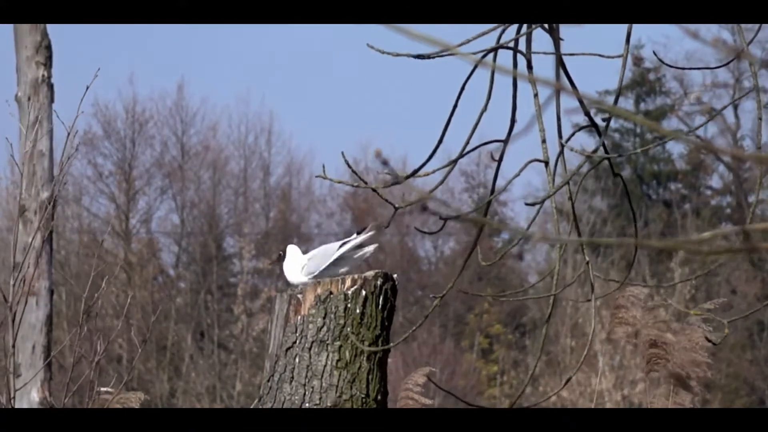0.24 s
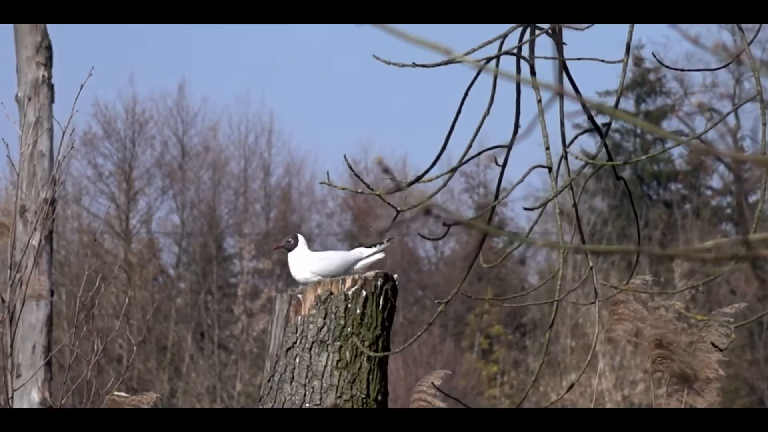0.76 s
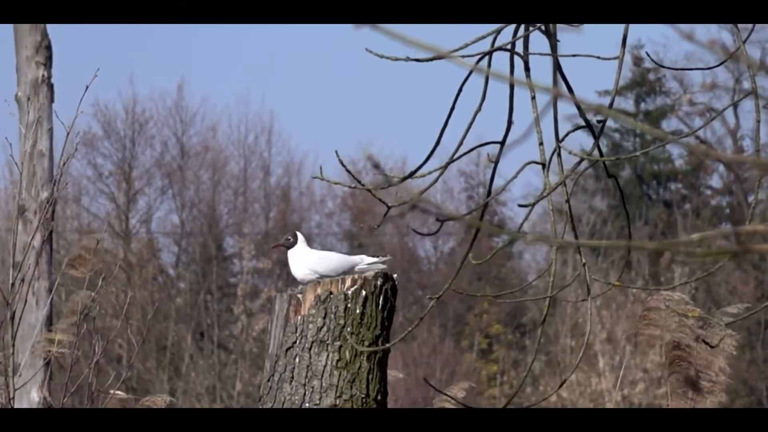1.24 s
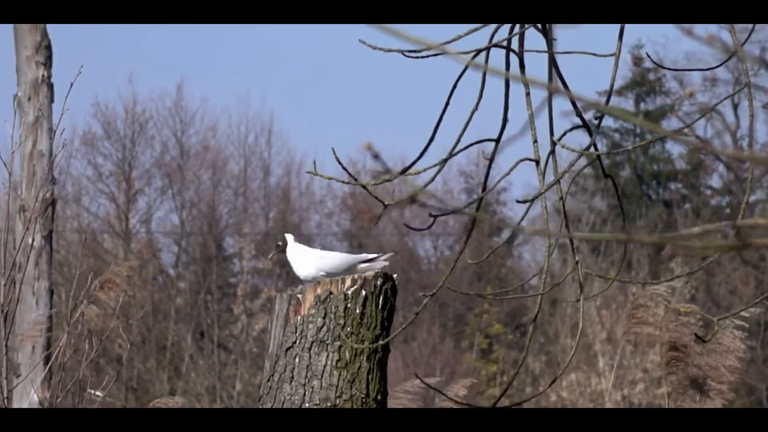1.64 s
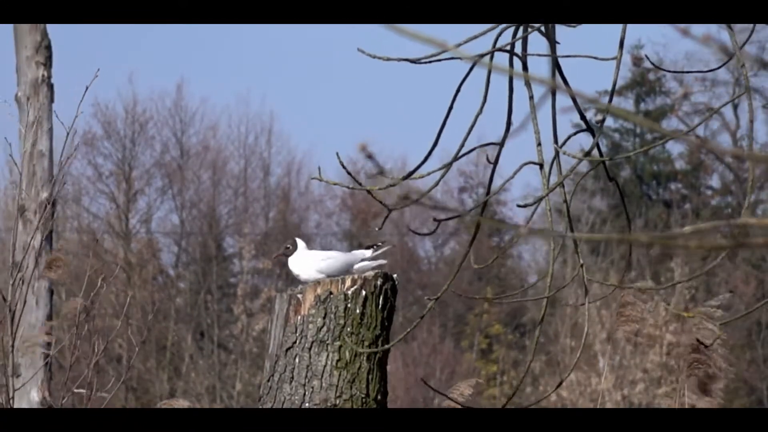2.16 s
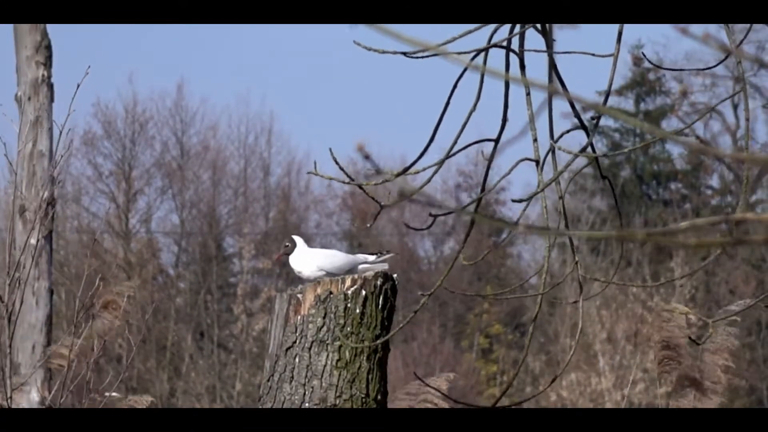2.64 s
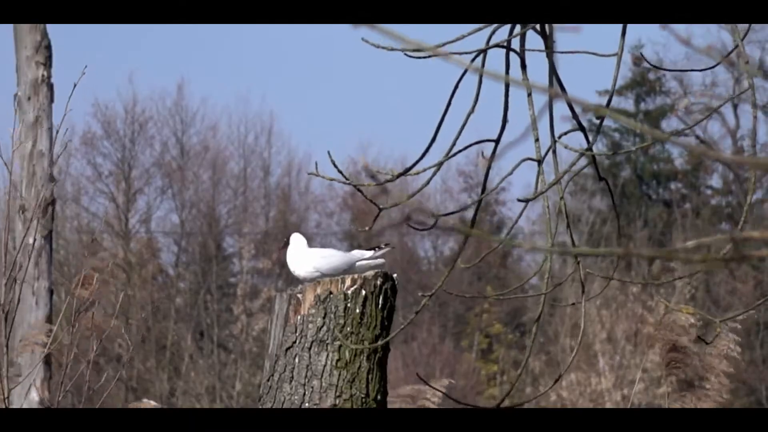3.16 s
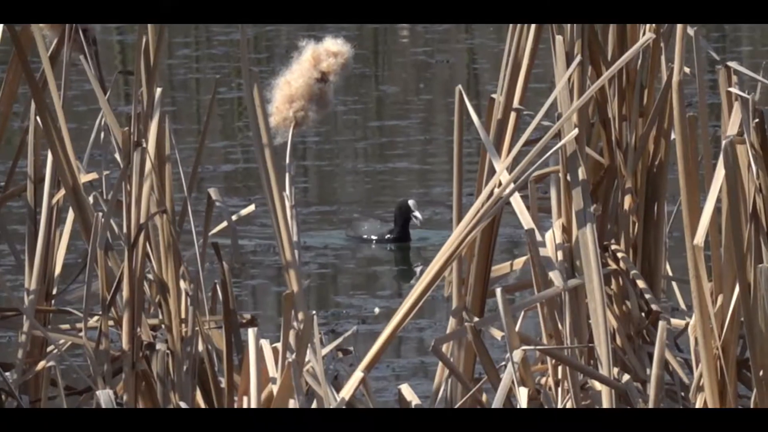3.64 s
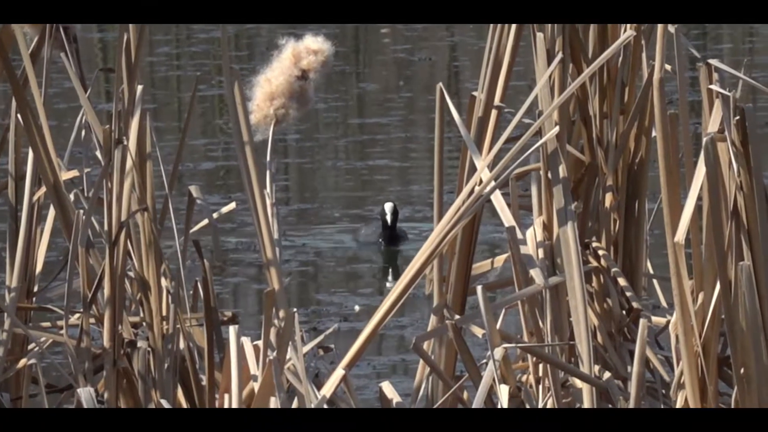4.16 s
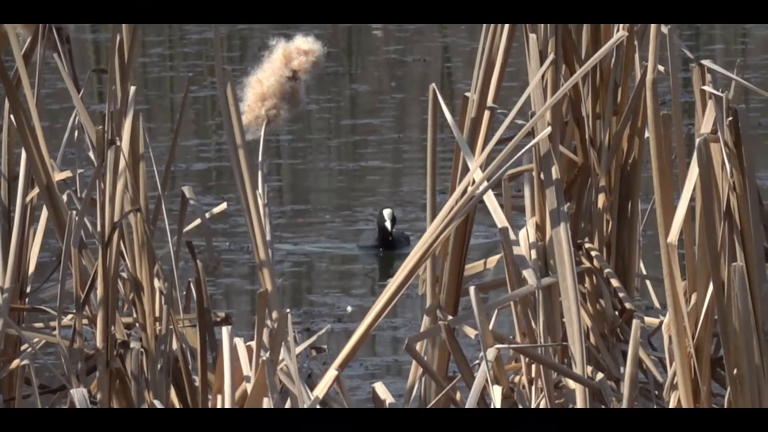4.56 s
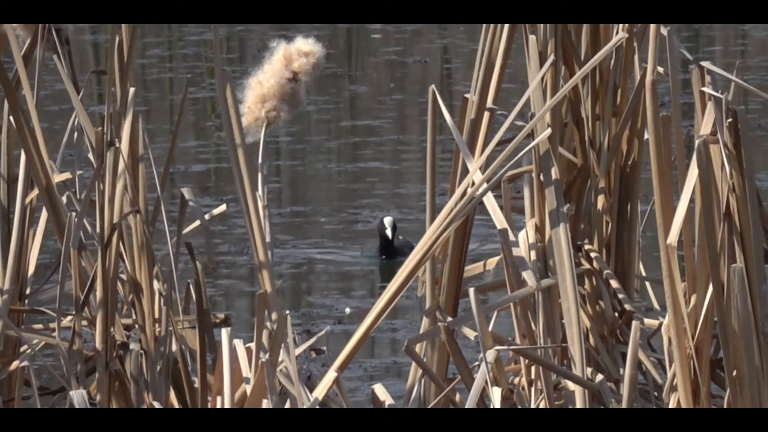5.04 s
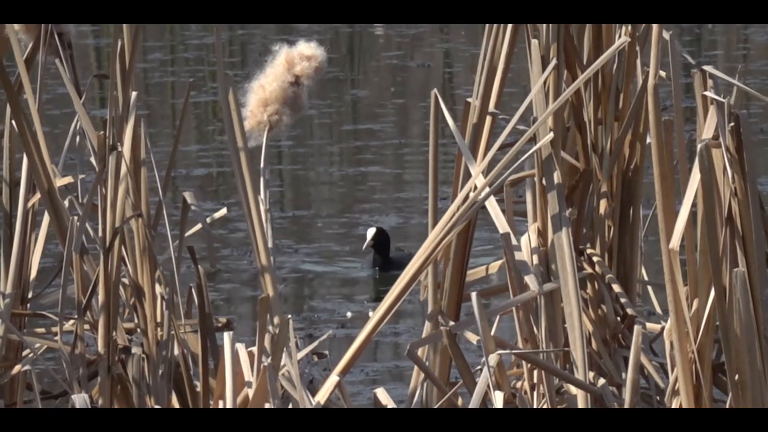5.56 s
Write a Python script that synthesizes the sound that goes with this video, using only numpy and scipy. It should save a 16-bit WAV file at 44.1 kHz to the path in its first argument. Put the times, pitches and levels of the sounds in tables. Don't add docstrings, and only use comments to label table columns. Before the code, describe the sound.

A steady, blurred clamour of many gulls fills an open, reedy lakeside throughout, with soft airy background and short echoes. A close gull is already calling at 0 s, then gives three arching, coarse, rapidly fluttering calls at about 0.2, 0.5 and 0.85 s. Brief high yelps come near 1.0-1.4 s, with a thin call and long rasp around 1.15 s. From 1.6 to 2.5 s, five hoarse brays rise and fall, loudest near 2.2 s. Thin, raspy cries overlap at 2.6 s, then a long falling call at 2.9 s. Clipped yelps cluster at 3.25-3.5 s; a higher rasp comes at 4 s. Low wind puffs buffet the microphone, strongest near 0.25 s and 2.9-3.9 s, dropping sharply after 4.2 s. The crowd dips briefly around 4.3 s. Short cries at 4.4 and 4.6 s lead to a piercing shriek at 4.7 s, then rising, swelling calls until 5.8 s.

```python
import sys
import numpy as np
from scipy import signal
from scipy.fft import rfft, irfft
from scipy.io import wavfile
from scipy.ndimage import uniform_filter1d

SR = 44100
rng = np.random.default_rng(int(sys.argv[2]) if len(sys.argv) > 2 else 0)


def field_ratio(decibels):
    return 10 ** (np.asarray(decibels, dtype=float) / 20)


def master(y):
    cut = np.clip(np.atleast_2d(y).T, -1, 1)
    pcm = np.round(cut * 32767)
    wavfile.write(sys.argv[1], SR, pcm.astype(np.int16))


N = 255339


def evened(x):
    return x / np.sqrt(np.mean(x ** 2) + 1e-20)


def read(points, hz):
    f, value = np.transpose(points)
    return np.interp(np.log(hz + 1), np.log(f + 1), value)


def follow(rows):
    s, *columns = np.transpose(rows)
    return [np.interp(np.arange(N) / SR, s, column) for column in columns]


def add(mix, s, sound):
    part = mix[round(s * SR):][:len(sound)]
    part += sound[:len(part)]


def wobble(n, hz):
    span = max(int(SR / hz), 2)
    noise = rng.standard_normal(n)
    return evened(uniform_filter1d(uniform_filter1d(noise, span), span))


def coloured(points, patchy_db):
    a, b, patches = rng.standard_normal((N // 512 + 5, 1025, 3)).T
    patches = evened(uniform_filter1d(uniform_filter1d(patches, 20, 0), 6, 1))
    level_db = read(points, np.fft.rfftfreq(2048, 1 / SR))[:, None] + patchy_db * patches
    z = (a + 1j * b) * field_ratio(level_db)
    return evened(signal.istft(z, nperseg=2048, noverlap=1536)[1][:N])


def open_air():
    # (frequency [Hz], level per Hz [dB])
    air = [(35, -32), (60, -5), (321, -14), (938, -8.5), (1160, -19), (1840, -50), (2220, -28), (3380, -46),
           (4170, -16), (8780, -31), (10300, -40.5), (15700, -46)]
    return field_ratio(-34) * coloured(air, patchy_db=2.0)


def wind():
    # (frequency [Hz], level per Hz [dB])
    gust = [(1, -20), (4, -2), (10, 0), (20, -6), (30, -15), (60, -20), (110, -32), (300, -45), (600, -90)]
    # (time [s], level [dB])
    breeze = [
        (0.0, -26.5),
        (4.1, -30),
        (4.3, -46),
        (4.5, -35.5),
        (5.63, -36),
        (5.79, -42),
    ]
    # (centre time [s], strength [dB], length [s])
    puffs = [(0.09, -29, .1), (0.239, -15.5, 0.074), (0.476, -21.5, 0.094), (0.777, -23, .18),
             (1.124, -30, .25), (1.397, -27, 0.15), (1.898, -26.5, 0.3), (2.077, -36, .12),
             (2.225, -27.5, .12), (2.373, -27, 0.094), (2.67, -26, 0.28), (2.928, -19, 0.12),
             (3.04, -17, 0.11), (3.46, -18, 0.29), (3.707, -14, 0.069), (3.859, -18.5, 0.17),
             (4.125, -25, 0.2), (4.422, -27, 0.065), (4.87, -46, .15), (5.5, -43, 0.17)]
    spectrum = rfft(rng.standard_normal(N))
    lumps = irfft(spectrum * field_ratio(read(gust, np.fft.rfftfreq(N, 1 / SR))), N)
    t = np.arange(N) / SR
    force = field_ratio(follow(breeze)[0])
    for s, db, length in puffs:
        force += field_ratio(db) * np.exp(-(2 * (t - s) / length) ** 2)
    return force * lumps / np.sqrt(uniform_filter1d(lumps ** 2, 14000) + 1e-12)


def shore(x):
    # (frequency [Hz], time to fall 60 dB [s])
    decay = [
        (500, 1),
        (2000, 0.4),
        (6000, 0.69),
        (14000, 0.032),
    ]
    taps = np.zeros(SR)
    at = np.arange(400, SR - 20, 20) + rng.integers(0, 20, (SR - 401) // 20)
    taps[at] = rng.choice([-1., 1.], len(at))
    hz, t, z = signal.stft(taps, SR, nperseg=256)
    tail = signal.istft(z * field_ratio(-60 * t / read(decay, hz)[:, None]), SR, nperseg=256)[1]
    return signal.fftconvolve(x, tail / np.linalg.norm(tail))[:N]


def cry(rows, voice, hoarse, top_hz):
    # (frequency [Hz], width [Hz], level [dB])
    tract = [
        (850, 400, -19),
        (1800, 650, 0),
        (2750, 450, -14.5),
        (12900, 3700, 0),
    ]
    bursts_hz, beak_hz, beak_db, edge_hz, edge_db, rasp_db = voice
    s, pitch_hz, effort_db = np.transpose(rows)
    t = np.arange(s[0], s[-1], 1 / SR)
    hz = uniform_filter1d(np.interp(t, s, pitch_hz), 600)

    flutter = np.cumsum(bursts_hz * (1 + .2 * hoarse * wobble(len(t), 60))) / SR % 1
    opening = np.sin(np.pi * np.minimum(flutter / 0.731, 1))
    gate = 0.22 + np.clip(2.34 * opening, 0, 1) ** 0.96
    bend = 1 + .062 * (flutter - .4) + .022 * hoarse * wobble(len(t), 120)

    k = np.arange(1, min(int(top_hz / hz.min()), 30) + 1)[:, None]
    *body, rasp = tract
    beak, edge = (beak_hz, 1000, beak_db), (edge_hz, 3200, edge_db)
    resonances = [*body, beak, edge, np.add(rasp, (0, 0, rasp_db))]
    power = sum(field_ratio(db) ** 2 / (1 + (2 * (k * hz[::64] - f) / w) ** 4) for f, w, db in resonances)
    heights = np.repeat(np.sqrt(power / power.sum(0)), 64, axis=1)[:, :len(t)]
    turns = np.cumsum(hz * bend) / SR + rng.random((30, 1))[:len(k)] / k
    heights *= field_ratio(1.8 * rng.standard_normal((30, 1))[:len(k)])
    gate = gate ** np.minimum(k * hz.mean() / 4000, 1.2)
    overtones = gate * heights * np.cos(2 * np.pi * k * turns)

    smeared = np.minimum(hoarse * (.6 + k * hz.mean() / 8000), .85)
    shake = wobble(len(t) + 9000, 750)[np.arange(len(t)) + 300 * k]
    stack = ((1 - smeared + smeared * shake) * overtones).sum(0)
    rise = t - t[0] + (t[0] < .001)
    edges = np.clip(np.minimum(rise, t[-1] - t) / .011, 0, 1)
    return s[0], field_ratio(np.interp(t, s, effort_db)) * evened(stack) * edges


def crowd(count=84):
    # (time [s], clamour [dB], nearness: treble added by closer birds [dB])
    swells = [(0.0, -24, -4), (0.31, -20, -3.5), (0.71, -21.5, 5.5), (1.1, -23, -6), (1.31, -21.5, 2),
              (1.54, -21, -14), (1.65, -23, 5), (2.05, -19.5, 6.5), (2.21, -20, -4), (2.71, -22.5, 8.5),
              (3.15, -19, -1.5), (3.56, -21, -3), (4.12, -20, 0.5), (4.31, -27, 1), (4.91, -23, 4),
              (5.36, -23.5, -1), (5.61, -23, 1.5), (5.79, -21, -2)]
    # (level over the clamour [dB], share of its swells [0-1], share of nearness [ratio])
    crowd_bands = [
        (-6.5, 0.97, 0.08),
        (0, 1.0, 0.12),
        (-10, 1, 0.87),
        (-28.5, 1, 1.8),
    ]
    mean_db = -22
    out = np.zeros(N + SR)
    for slot, (late, long, high, far, rate, beak) in enumerate(rng.random((count, 6))):
        s = (slot + late) * (N / SR + .4) / count + .002
        length, hz, db = .12 + .25 * long, 600 + 480 * high, -7 * far
        rows = [(s, .9 * hz, db + 2.5), (s + .4 * length, hz, db),
                (s + .8 * length, .99 * hz, db), (s + length, .92 * hz, db - 6)]
        voice = (60 + 40 * rate, 3100 + 1600 * beak, -8, 7000, -18, -40)
        add(out, *cry(rows, voice, .75, top_hz=8500))
    out = out[round(.4 * SR):][:N]

    spectrum, hz = rfft(out + field_ratio(-1.5) * shore(out)), np.fft.rfftfreq(N, 1 / SR)
    corners_hz = np.array([[350], [1350], [2600], [5400], [30000]])
    above = 1 / (1 + (corners_hz / (hz + 1)) ** 8)
    bands = [irfft(spectrum * share, N) for share in above[:-1] - above[1:]]
    steady = [b / np.sqrt(uniform_filter1d(b ** 2, 6500) + 1e-12) for b in bands]
    clamour_db, near_db = follow(swells)
    total = np.zeros(N)
    for band, (db, swell, near) in zip(steady, crowd_bands):
        level_db = mean_db + db + swell * (clamour_db - mean_db) + near * near_db
        total += field_ratio(level_db) * band
    return field_ratio(-2.5) * total


def unfold(shape, start, length, first_hz, last_hz, effort_db):
    share, ratio, db = np.transpose(shape)
    pitch_hz = ratio * (first_hz + share * (last_hz - first_hz))
    return np.transpose([start + share * length, pitch_hz, effort_db + db])


def near_birds():
    # (share of its length [0-1], pitch ratio [ratio], effort [dB])
    arch = [
        (0, .86, -6.5),
        (.2, 0.93, 0),
        (.6, 0.98, 2.5),
        (.9, 0.95, 1.5),
        (1, .92, -12),
    ]
    glide = [
        (0, 1.0, 4),
        (.5, 1.02, 0.5),
        (0.999, 1.0, -0.5),
    ]
    yelp = [
        (0, .93, 2),
        (.4, 0.96, 2.5),
        (1, .94, -20.5),
    ]
    rasp = [
        (0, .8, -3),
        (.2, .96, 2),
        (.5, 1.01, 2),
        (.8, .98, -3.5),
        (1, .89, 0),
    ]
    shriek = [
        (0, .905, -18),
        (.165, .93, -8),
        (.205, 0.94, -0.5),
        (.55, 0.99, 0.5),
        (.8, .99, -3.5),
        (1, .94, -1),
    ]
    swell = [
        (0, 1.0, -8),
        (.55, 1.01, -1),
        (1, 1.0, 2),
    ]

    # (burst rate [1/s], beak [Hz], beak [dB], edge [Hz], edge [dB], rasp [dB]), levels over the throat
    neighbour_voice = (92.5, 4448, -8, 6800, -26.5, -45.5)
    bray_voice = (88, 4004, -14, 4900, -22.5, -61)
    hoarse_voice = (86.5, 4410, -6, 6000, -19.5, -75)
    low_voice = (81.5, 3900, 2, 5800, -24, -52)
    dull_voice = (90.5, 4200, -55, 5500, -55, -50)
    thin_voice = (78, 5700, -6.5, 7300, -18.5, -32)
    sharp_voice = (85.5, 3200, 9.5, 5000, 1.5, -27)
    yelp_voice = (90, 3200, -19, 5500, -26.5, -54)
    rasp_voice = (82, 3300, 10.5, 5450, -4, -17)
    shriek_voice = (77.5, 3600, 15.5, 6100, -1, -21)
    swell_voice = (86.5, 4400, -16, 6000, -27.5, -50)

    # (start [s], length [s], first pitch [Hz], last pitch [Hz], effort [dB])
    neighbour_arches = [
        (0.19, 0.23, 856, 934.5, -22),
        (0.53, 0.19, 960, 948, -20.5),
        (0.845, .19, 949, 958, -23),
    ]
    neighbour_glides = [
        (0.0, 0.084, 901, 830, -20),
        (2.78, 0.16, 700, 667, -28),
    ]
    brays = [
        (1.59, .2, 891, 994, -28),
        (1.77, 0.19, 996, 902, -23),
        (1.97, .2, 941, 910, -27),
        (2.22, .17, 925, 1011, -22),
        (2.37, 0.17, 1003, 890, -25),
    ]
    hoarse_glides = [
        (0.41, .09, 926, 947, -37),
        (2.93, .28, 962, 870, -29),
        (3.87, .13, 960, 950, -28),
        (4.0, .16, 944, 894, -29),
        (4.19, .055, 947, 924, -39),
        (4.75, .28, 873, 920, -30),
        (5.54, 0.17, 852, 956, -27),
    ]
    low_glides = [
        (1.59, .17, 739, 772, -29),
        (3.71, 0.13, 700, 767, -35),
        (3.86, .11, 770, 749, -33),
    ]
    dull_glides = [
        (1.49, 0.11, 620, 667, -29.5),
        (1.5, 0.077, 928, 894, -43),
        (4.8, .2, 590, 705, -36.5),
        (5.56, 0.18, 670, 713, -31.5),
    ]
    thin_arches = [
        (1.16, .2, 1151, 1100, -31.5),
        (2.56, 0.18, 1230, 1170, -32.5),
        (5.025, .125, 960, 910, -32),
    ]
    sharp_glides = [
        (2.63, 0.133, 1033, 1062, -31),
        (3.3, 0.045, 946, 904, -38),
        (4.855, 0.15, 1344, 1220, -36),
    ]
    yelps = [(0.15, 0.061, 1240, 1076, -28), (1.02, 0.02, 1197, 1126, -18.5),
             (1.09, 0.049, 1140, 1205, -30), (1.36, .14, 1147, 1097, -30), (2.97, .06, 1390, 1391, -41),
             (3.258, .067, 1114, 1130, -22.5), (3.388, 0.057, 1075, 1137, -24),
             (3.45, .04, 1150, 1074, -24), (3.57, 0.059, 1120, 1270, -34), (3.75, .11, 1138, 1120, -28.5),
             (4.11, 0.14, 1100, 1144, -34.5)]
    rasps = [
        (1.145, 0.21, 1085, 1080, -32),
        (2.56, 0.19, 1067, 1065, -33.5),
        (3.99, .21, 1187, 1193, -29.5),
    ]
    shrieks = [
        (4.69, .165, 1272, 1275, -18.5),
    ]
    swelling_cries = [
        (3.5, .17, 970, 866, -29),
        (4.4, 0.12, 882, 870, -25.5),
        (4.58, .13, 862, 866, -25.5),
        (5.39, 0.15, 796, 900, -26.5),
        (5.7, .09, 927, 860, -25.5),
        (1.2, .15, 800, 926, -25.5),
    ]

    birds = [(neighbour_arches, arch, neighbour_voice, .3),
             (neighbour_glides, glide, neighbour_voice, .28),
             (brays, glide, bray_voice, .42),
             (hoarse_glides, glide, hoarse_voice, .5),
             (low_glides, glide, low_voice, .5),
             (dull_glides, glide, dull_voice, .35),
             (thin_arches, arch, thin_voice, .25),
             (sharp_glides, glide, sharp_voice, .35),
             (yelps, yelp, yelp_voice, .2),
             (rasps, rasp, rasp_voice, .36),
             (shrieks, shriek, shriek_voice, .28),
             (swelling_cries, swell, swell_voice, .4)]
    out = np.zeros(N)
    for cries, shape, voice, hoarse in birds:
        for row in cries:
            add(out, *cry(unfold(shape, *row), voice, hoarse, top_hz=15600))
    return field_ratio(3.0) * (out + field_ratio(-11.5) * shore(out))


def scene():
    return (open_air() + wind() + crowd() + near_birds())[None]


def low_pass(x):
    return signal.sosfilt(signal.butter(12, 15880, fs=SR, output="sos"), x)


def record(dry):
    return low_pass(dry)


dry = scene()
out = record(dry)
master(out)
```